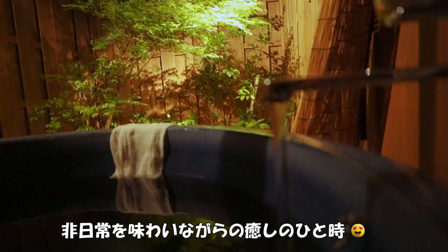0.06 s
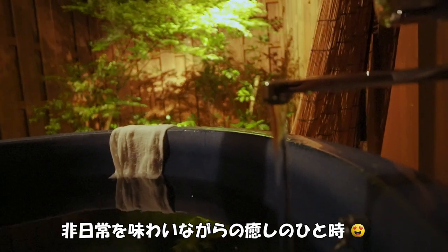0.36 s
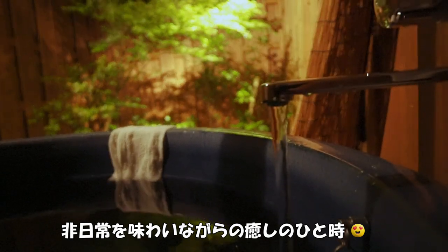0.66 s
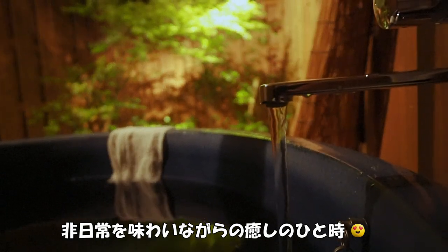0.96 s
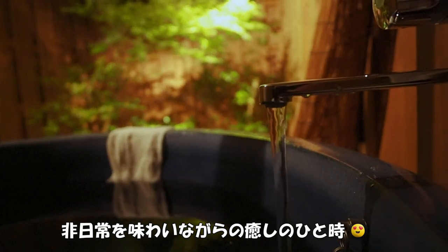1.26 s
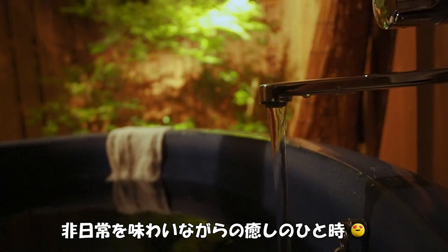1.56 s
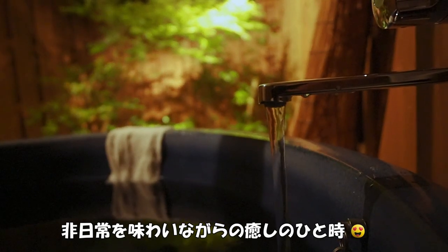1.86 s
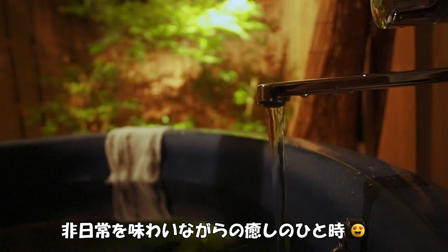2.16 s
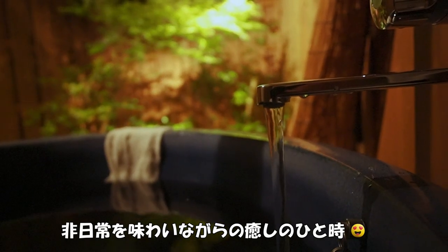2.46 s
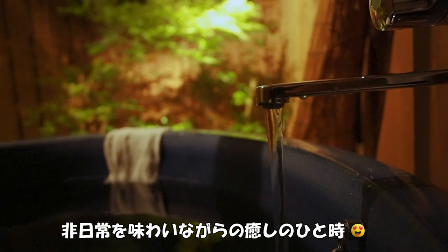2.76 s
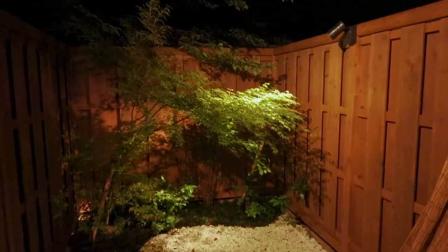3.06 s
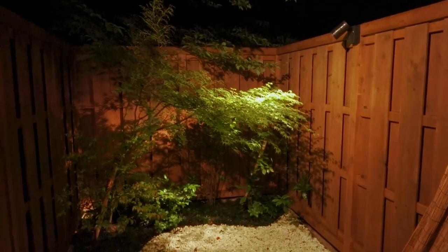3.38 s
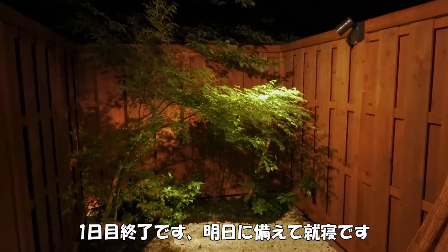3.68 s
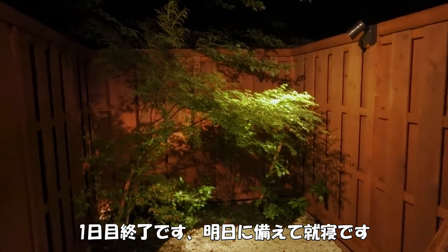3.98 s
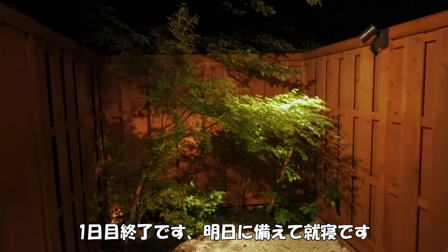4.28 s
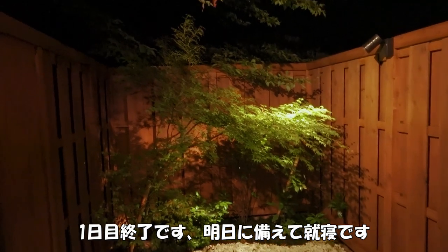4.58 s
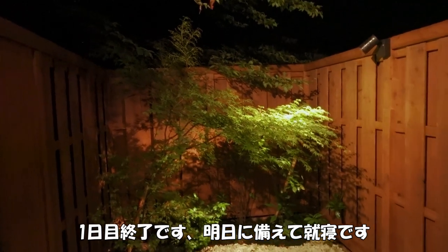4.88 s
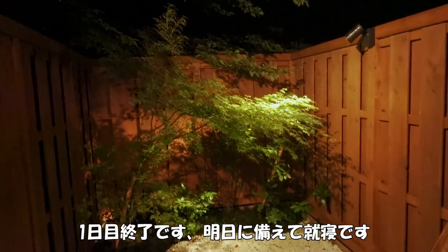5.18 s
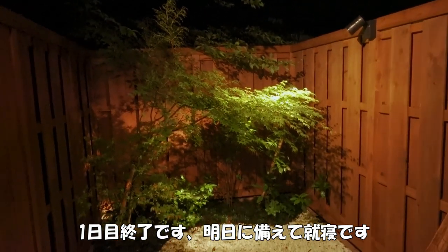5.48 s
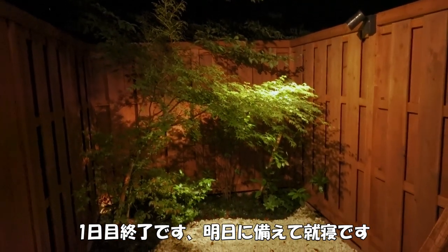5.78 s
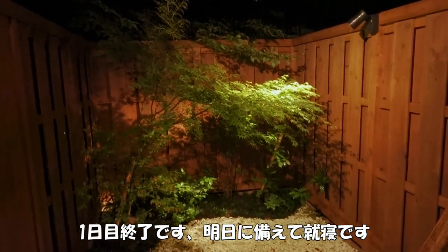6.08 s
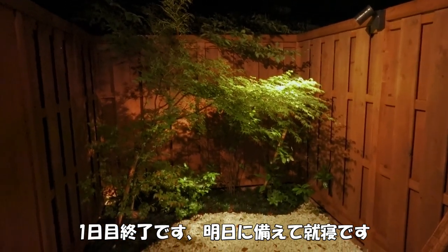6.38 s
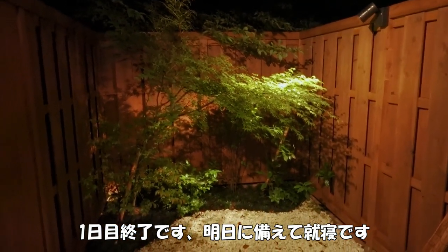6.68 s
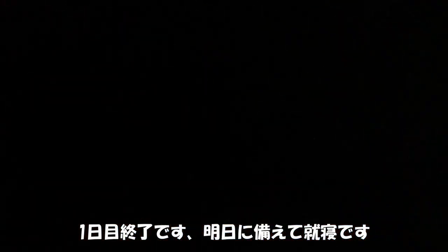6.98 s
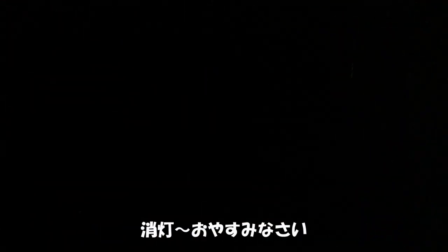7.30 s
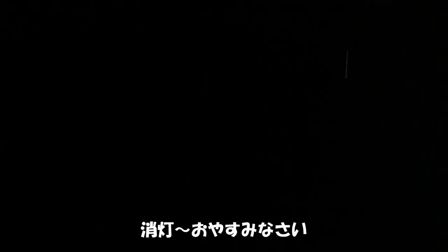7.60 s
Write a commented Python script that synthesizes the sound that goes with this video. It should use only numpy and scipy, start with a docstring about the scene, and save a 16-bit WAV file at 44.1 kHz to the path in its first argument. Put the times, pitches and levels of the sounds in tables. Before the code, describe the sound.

A tap trickles and drips into a full outdoor bath under shrill distant frogs, then much louder water suddenly patters and splashes down.

```python
"""A tap trickles and drips into a full outdoor bath at night; a pump hums, far frogs shrill.
After three seconds the scene jumps to the fenced garden, where water patters down loudly:
countless impacts merge into a rush, fat drops smack and spray, bubbles ring in puddles
and a few dull knocks sound. Impacts are noise bursts, bubbles are rising sine pings."""
import sys
import numpy as np
from scipy import signal
from scipy.fft import rfft, irfft
from scipy.io import wavfile
from scipy.ndimage import uniform_filter1d

SR = 44100
rng = np.random.default_rng(int(sys.argv[2]) if len(sys.argv) > 2 else 0)


def unload_audio(sound):
    """Save the sound as a 16-bit wav file, at the path given as the first command line argument."""
    columns = np.transpose(np.atleast_2d(sound))
    # keep every value between -1 and 1, then stretch to whole-number steps
    steps = np.round(np.clip(columns, -1, 1) * 32767)
    wavfile.write(sys.argv[1], SR, steps.astype(np.int16))


N = 336924
TIME = np.arange(N) / SR
CUT_S = 3.018  # tub to garden

# left-right likeness in each place: (frequency [Hz], correlation [-1..1])
TUB_CORR = [(280, .99), (640, .8), (1600, .85), (2400, .72), (3300, .8), (6000, .48), (10000, .35),
            (14000, 0)]
GARDEN_CORR = [(90, .94), (220, .99), (400, .96), (740, .87), (1600, .58), (2400, .62), (3600, .35),
               (5500, -.02), (9000, -.08), (15000, 0)]


def amp(db):
    """Decibels to gain."""
    return 10 ** (np.asarray(db) / 20)


def unit(x):
    """Scale to rms 1."""
    return x / np.sqrt(np.mean(x ** 2) + 1e-20)


def log_interp(points, hz):
    """Table lookup on a log-frequency axis."""
    f, value = np.transpose(points)
    return np.interp(np.log(hz + 1), np.log(f), value)


def add(mix, start_s, sound):
    """Add a stereo sound to the mix in place."""
    part = mix[:, round(start_s * SR):][:, :sound.shape[1]]
    part += sound[:, :part.shape[1]]


def shape(x, gain, corr):
    """Filter two independent channels by gain(hz), blend to correlation corr; rms 1."""
    hz = np.fft.rfftfreq(x.shape[1], 1 / SR)
    a, b = rfft(x)
    angle = np.arccos(np.clip(log_interp(corr, hz), -1, 1)) / 2
    mid, side = a * np.cos(angle), b * np.sin(angle)
    return unit(irfft(np.array([mid + side, mid - side]) * gain(hz), x.shape[1]))


def resonances(rows, hz):
    """Gain of steep-skirted bands; a row's dB sets its total power."""
    powers = (amp(db) ** 2 / width / (1 + ((hz - f) / width) ** 2) ** 3 for f, width, db in rows)
    return np.sqrt(sum(powers))


def drift(rate_hz):
    """Slow random curve, rms 1."""
    lowpass = np.exp(-(np.fft.rfftfreq(N, 1 / SR) / rate_hz) ** 2)
    return unit(irfft(rfft(rng.standard_normal(N)) * lowpass, N))


def patter(per_s, spread_db, decay_s):
    """Dense tiny impacts of uneven size, each a puff of noise; rms 1."""
    sizes = amp(spread_db * np.minimum(rng.exponential(1, N), 4))
    impacts = sizes * (rng.random(N) < per_s / SR)
    pole = np.exp(-2 / (decay_s * SR))
    power = signal.lfilter([1], [1, -pole], impacts ** 2)
    return unit(np.sqrt(power) * rng.standard_normal((2, N)))


def envelope(t, rise_s, decay_s):
    """Exponential rise and decay, peak 1."""
    swell = (1 - np.exp(-t / rise_s)) * np.exp(-t / decay_s)
    return swell / swell.max()


def burst(centre_hz, width_oct, rise_s, decay_s, corr=GARDEN_CORR, low_cut_hz=170):
    """One impact: a decaying noise band, rms about 1 at its crest."""
    t = np.arange(int((rise_s + decay_s) * 6 * SR) + 256) / SR
    noise = rng.standard_normal((2, len(t)))
    band = shape(noise, lambda hz: np.exp(-.5 * (np.log2((hz + 1) / centre_hz) / width_oct) ** 2), corr)
    swell = envelope(t, rise_s, decay_s)
    hit = signal.lfilter(*signal.butter(2, low_cut_hz, "high", fs=SR), band * swell)
    return unit(hit) * np.sqrt(np.mean(swell ** 2))


def ping(hz, rise_s, decay_s, corr=GARDEN_CORR, glide=0):
    """Pure ring, as of a bubble; pitch climbs by the fraction glide per decay time."""
    t = np.arange(int((rise_s + decay_s) * 7 * SR)) / SR
    phase = 2 * np.pi * hz * t * (1 + glide * t / decay_s / 2)
    stereo_rad = np.arccos(log_interp(corr, hz)) * np.array([[.5], [-.5]])
    return np.sqrt(2) * envelope(t, rise_s, decay_s) * np.sin(phase + stereo_rad)


def fence_echo(x, t60_s=.29):
    """Scattered reflections off the wooden fence, from 3 ms on."""
    t = np.arange(SR // 2) / SR
    taps = rng.standard_normal((2, len(t))) * (rng.random((2, len(t))) < .1)
    taps *= (t > .003) * amp(-60 * t / t60_s)
    taps = shape(taps, np.ones_like, GARDEN_CORR) / np.sqrt(len(t))
    return signal.fftconvolve(x, taps, axes=1)[:, :N]


def frog_chorus(count=60, notes_per_s=3.1, pulse_hz=130, blur=.15):
    """Far frogs repeat pulsed notes that distance melts together; unfiltered pulsing noise."""
    t = TIME[:N // 8 * 8:8]
    power = np.zeros(len(t))
    for pace, pitch, start in rng.uniform(-1, 1, (count, 3)):
        note = np.sin(np.pi * (notes_per_s * (1 + .27 * pace) * t + start)) ** 2
        pulses = np.exp(-(pulse_hz * (1 + .4 * pitch) * t % 1) / .71)
        power += (blur + note) * pulses
    return np.sqrt(np.interp(TIME, t, power)) * rng.standard_normal((2, N))


def tub_frogs(chorus, level_db=-41):
    """The chorus at the tub: three voice bands."""
    # frog voices: (centre [Hz], width [Hz], relative level [dB])
    voice_bands = [(1630, 344, -5.5), (3074, 263, 0.5), (3346, 313, 1.5)]
    return amp(level_db) * shape(chorus, lambda hz: resonances(voice_bands, hz), TUB_CORR)


def garden_frogs(chorus, level_db=-44, centre_hz=3110, width_hz=350, fade_db=-3, fade_from_s=5.9):
    """The chorus in the garden: one shrill band that eases off over a second."""
    voices = shape(chorus, lambda hz: resonances([(centre_hz, width_hz, 0)], hz), GARDEN_CORR)
    return voices * amp(level_db + fade_db * np.clip(TIME - fade_from_s, 0, 1))


def garden_hum():
    """Faint tones that waver in pitch."""
    # hum tones: (pitch [Hz], waver [Hz], relative level [dB])
    partials = [(211, 5, -7), (260, 3, 0), (548, 4, -6)]
    # hum swell: (time [s], level [dB])
    swell = [(3.0, -73), (5.7, -65), (6.4, -60), (6.9, -57.5), (7.2, -63), (7.6, -65)]
    tones = np.zeros(N)
    for hz, waver_hz, db in partials:
        pitch_hz = hz + waver_hz * drift(rate_hz=8.04)
        tones += amp(db) * np.sin(2 * np.pi * np.cumsum(pitch_hz) / SR)
    return unit(tones) * amp(np.interp(TIME, *np.transpose(swell)))


def pump(level_db=-61.9, waver_db=2.5):
    """Pump hum: narrow low noise bands, wavering in level."""
    # pump resonances: (centre [Hz], width [Hz], relative level [dB])
    hum_bands = [(141, 7.9, -76), (167.8, 5, -67.5), (219, 46, -69.5), (260.4, 5.4, -64.5),
                 (280.2, 8.9, -64.5)]
    hum = shape(rng.standard_normal((2, N)), lambda hz: resonances(hum_bands, hz), TUB_CORR)
    return hum * amp(level_db + waver_db * drift(rate_hz=3.7))


def tap_stream(level_db=-51, waver_db=.96):
    """A thin stream wavers as it enters the water; spout and tub add a faint ring."""
    # stream and surrounding air: (frequency [Hz], relative density [dB])
    spectrum = [(30, -42), (70, -19.5), (130, -8.5), (320, -3.5), (490, -11), (650, -4), (1000, -2.5),
                (1500, 4), (2400, 1.5), (4300, -2.5), (7200, -8), (10000, -15.5), (16000, -21)]
    # spout and tub resonances: (centre [Hz], width [Hz], boost [dB])
    rings = [(638, 20, 4), (5400, 170, 2.5), (6490, 160, 1.5), (7130, 150, 5), (8210, 160, 3.5),
             (9860, 200, 2.5)]

    def colour(hz):
        boost_db = sum(db * np.exp(-((hz - f) / width) ** 2) for f, width, db in rings)
        return amp(log_interp(spectrum, hz) + boost_db)

    water = patter(per_s=3500, spread_db=2, decay_s=.0036) * amp(waver_db * drift(rate_hz=14))
    return amp(level_db) * shape(water, colour, TUB_CORR)


def tap_drips(tick_db=-6, bubble_db=-10, plink_hz=1620, echo_db=-8):
    """Each drip ticks, a bubble pings, the tub plinks lower down; at times the stream fizzes."""
    # drips: (time [s], base level [dB], pitch [Hz], tick width [oct], plink level [dB])
    drips = [(0.0916, -36, 5520, .15, -54), (0.1615, -34, 4720, 0.41, -56), (0.3223, -39, 5700, 0.46, -43),
             (0.5886, -40, 6200, 0.31, -44), (1.05, -36, 3970, .22, -42), (1.292, -34.5, 5360, .3, -42),
             (1.3092, -39, 5650, .4, -42), (1.504, -35.5, 4400, 0.11, -48), (1.5487, -42, 4700, .4, -42),
             (1.8155, -40, 6900, 0.28, -45), (2.168, -39, 4070, .1, -52), (2.24, -37.5, 6840, 0.33, -46),
             (2.2872, -41, 7200, .55, -42), (2.4388, -38, 6750, 0.27, -40), (2.4756, -39, 5840, .25, -43),
             (2.5062, -40, 6750, 0.41, -45), (2.5835, -35.5, 5800, 0.32, -41.5)]
    # stream breaking up: (time [s], level [dB], centre [Hz], decay [s])
    fizzes = [(.09, -56, 5600, 0.02), (.165, -57, 6000, 0.05), (0.624, -55.5, 8100, 0.03),
              (1.04, -62, 8500, .08), (1.33, -60, 7500, 0.041), (1.549, -48, 4470, 0.084),
              (1.591, -54, 5200, .05), (2.045, -56, 9500, 0.021), (2.545, -55.5, 7000, 0.03),
              (2.758, -50.5, 7200, 0.038)]
    out = np.zeros((2, N))
    for s, db, hz, width_oct, plink_db in drips:
        add(out, s, amp(db + tick_db) * burst(hz, width_oct, rise_s=.0004, decay_s=.0015, corr=TUB_CORR))
        add(out, s, amp(db + bubble_db) * ping(hz, rise_s=.0007, decay_s=.003, corr=TUB_CORR, glide=.01))
        add(out, s, amp(plink_db) * ping(plink_hz, rise_s=.0008, decay_s=.007, corr=TUB_CORR))
    for s, db, hz, decay_s in fizzes:
        add(out, s, amp(db) * burst(hz, width_oct=.43, rise_s=.0072, decay_s=decay_s, corr=TUB_CORR))
    return out + amp(echo_db) * fence_echo(out)


def flurry_power(rise_s=.029, fade_s=.058):
    """Spray power: water lands in flurries that gather fast and thin out more slowly."""
    # flurry crests: (time [s], level [dB])
    crests = [(3.054, -32), (3.244, -33), (3.442, -37.5), (3.533, -40), (3.64, -37), (3.756, -35.5),
              (3.84, -35.5), (3.938, -37.5), (4.047, -34.5), (4.131, -39), (4.262, -35), (4.433, -35),
              (4.482, -40), (4.582, -42), (4.667, -36), (4.771, -33.5), (4.888, -33.5), (5.085, -32.5),
              (5.275, -35.5), (5.335, -39.5), (5.533, -34), (5.66, -41), (5.766, -33.5), (5.858, -33),
              (5.912, -39.5), (6.011, -36.5), (6.134, -40), (6.235, -34), (6.404, -34), (6.599, -34.5),
              (6.678, -35.5), (6.815, -33.5), (7.031, -34.5), (7.138, -34), (7.194, -43), (7.266, -36),
              (7.315, -38.5), (7.447, -35), (7.51, -36.5)]
    power = np.zeros(N)
    for s, db in crests:
        span = slice(max(int((s - .2) * SR), 0), int((s + .5) * SR))
        age_s = TIME[span] - s
        falloff = np.where(age_s < 0, (age_s / rise_s) ** 2, age_s / fade_s)
        power[span] += (amp(db) * np.exp(-falloff)) ** 2
    return power


def sparkle(x, depth_db):
    """Short random patches of the spectrum swell and fade; rms 1."""
    spectra = signal.stft(x, nperseg=256)[2]
    patches = rng.standard_normal(spectra.shape[1:])
    for _ in range(2):
        patches = uniform_filter1d(patches, size=7, axis=0)
        patches = uniform_filter1d(patches, size=6, axis=1)
    spectra *= amp(depth_db * unit(patches))
    return unit(signal.istft(spectra)[1][:, :N])


def rush(surge_exponent=.024, waver_db=.85, lull_db=-41.5):
    """Far water merges into an even rush that surges slightly with each flurry of near spray."""
    # far rush: (frequency [Hz], relative density [dB])
    far_spectrum = [(30, -33), (70, -31), (110, -24.5), (170, -15), (210, -7.5), (260, -6), (330, -3.5),
                    (540, 1), (1200, 2), (2600, 3.5), (4200, 2), (7500, -7.5), (12000, -8.5), (16000, -26)]
    # fine spray: (frequency [Hz], relative density [dB])
    near_spectrum = [(600, -45), (2000, -2.5), (4000, 1.5), (6500, 1.5), (9000, -0.5), (11800, -1),
                     (13500, -2), (16000, 0)]
    # swell of the far rush: (time [s], level [dB])
    swell = [(3.05, -38), (3.35, -38.5), (3.66, -38), (4.05, -37), (4.3, -38.5), (5.1, -38), (6.55, -38.5),
             (7.1, -37), (7.6, -38.5)]
    far = patter(per_s=6000, spread_db=2, decay_s=.002)
    far = shape(far, lambda hz: amp(log_interp(far_spectrum, hz)), GARDEN_CORR)
    near = patter(per_s=3000, spread_db=1.5, decay_s=.0018)
    near = shape(near, lambda hz: amp(log_interp(near_spectrum, hz)), GARDEN_CORR)
    near = sparkle(near, depth_db=1.5)
    near_gain = np.sqrt(amp(lull_db) ** 2 + flurry_power())
    far_gain = amp(np.interp(TIME, *np.transpose(swell)) + waver_db * drift(rate_hz=7.4))
    surge = (near_gain / np.median(near_gain[TIME > CUT_S])) ** surge_exponent
    return far * far_gain * surge + near * near_gain


def droplets(count=320, base_db=-42, spread_db=3, lowest_hz=1800):
    """Small drops all over the garden; the higher they ring, the sooner they die."""
    out = np.zeros((2, N))
    for when, pitch, faintness in rng.random((count, 3)):
        hz = lowest_hz * 8 ** pitch
        ring = burst(hz, width_oct=.48, rise_s=.0003, decay_s=14 / hz)
        start_s = CUT_S + when * (TIME[-1] - CUT_S)
        add(out, start_s, amp(base_db - spread_db * np.log(faintness + .26)) * ring)
    return out


def spatters(count=120, base_db=-38, spread_db=2, centre_hz=7500, spread_oct=.89):
    """Flurries throw off tiny ticking drops; stronger flurries throw more."""
    out = np.zeros((2, N))
    thrown = np.cumsum(np.sqrt(flurry_power()))
    for when, pitch, faintness in rng.random((count, 3)):
        hz = centre_hz * 2 ** (spread_oct * (2 * pitch - 1))
        tick = burst(hz, width_oct=.14, rise_s=.0004, decay_s=.0014)
        start_s = TIME[np.searchsorted(thrown, when * thrown[-1])]
        add(out, start_s, amp(base_db - spread_db * np.log(faintness + .1)) * tick)
    return out


def splashes(smack_db=1.5, ring_db=-6, scatter_db=-16, slap_db=-2.5, bubble_db=.6, echo_db=-10):
    """Fat drops smack and scatter droplets; others plop and gurgle in puddles, amid dull knocks."""
    # fat drops: (time [s], base level [dB], centre [Hz], smack width [oct], left minus right [dB])
    drops = [(3.038, -31, 12700, .5, 0), (3.0557, -27, 10000, 0.49, -3), (3.0988, -24.5, 11000, .7, -2),
             (3.238, -33, 8900, .5, -1), (3.245, -25, 7200, 0.48, 0), (3.432, -29, 8900, .6, -3),
             (3.601, -30, 12000, 0.3, -1), (3.6426, -27, 7300, .7, -2), (3.7468, -27, 7560, 0.38, -5),
             (3.7598, -28, 12600, .8, -2), (3.9125, -35, 7200, .6, -1), (3.9236, -21, 10900, .17, 0),
             (3.944, -23, 11800, .22, -1), (4.0418, -20.5, 11200, 0.3, -1), (4.134, -32, 10800, .4, -1),
             (4.25, -32, 8300, .6, -1), (4.2593, -32, 10800, .4, -3), (4.2918, -34, 7780, 0.37, -1),
             (4.311, -26.5, 11900, 0.46, -2), (4.4214, -37, 7600, .7, -1), (4.4655, -29, 8600, 0.43, 1),
             (4.566, -29, 13000, 0.49, -1), (4.77, -36, 10100, .5, -1), (4.879, -34, 11300, .35, -1),
             (4.8875, -32, 6940, 0.43, 10), (4.9485, -33.5, 10300, .5, -1), (5.087, -30, 9600, .5, -1),
             (5.2487, -34, 7600, .45, -1), (5.28, -30.5, 8400, 0.55, 7), (5.3198, -34, 8400, .7, -1),
             (5.479, -32, 12000, .5, -1), (5.542, -32, 11000, .4, -1), (5.6504, -27, 11400, .25, 0),
             (5.752, -30.5, 9000, .4, 1), (5.7868, -30, 12500, .8, -5), (5.849, -30, 6680, .8, -3),
             (5.9138, -35, 8000, .4, -1), (5.9967, -28, 7800, 0.9, 2), (6.0918, -31, 13850, .25, -1),
             (6.2181, -26, 14000, .4, -3), (6.2234, -18, 11500, .75, -3), (6.2964, -25, 9050, .7, 0),
             (6.398, -34, 6060, .35, -3), (6.4171, -33, 13500, .42, -7), (6.5735, -36, 10600, .4, -1),
             (6.5944, -23.5, 7100, 0.56, -2), (6.690, -33, 11600, .4, -1), (6.805, -27, 12300, 0.92, -3),
             (6.824, -30, 10100, 0.57, -3), (7.0302, -27, 7840, 0.32, -3), (7.084, -30, 10800, 0.45, -1),
             (7.1297, -24, 10400, 0.59, -1), (7.1871, -25, 12300, 0.22, -5), (7.312, -32, 8800, 0.51, -1),
             (7.441, -33, 5750, 0.29, 1), (7.460, -32.5, 11700, .4, -1)]
    # drops into puddles: (time [s], base level [dB], pitch [Hz])
    plops = [(3.2465, -30.5, 3400), (3.4333, -30.5, 2940), (3.480, -37, 2320), (3.5576, -25.5, 2170),
             (3.755, -30, 2450), (3.9505, -31, 2760), (4.075, -34, 2680), (4.259, -33, 3190),
             (4.4225, -27, 3730), (4.439, -30.5, 3560), (4.4848, -29.5, 3170), (4.573, -30, 4200),
             (4.7626, -28.5, 3510), (4.820, -28.5, 2280), (4.9337, -28.5, 3280), (5.091, -34.5, 3000),
             (5.5804, -28, 2050), (5.753, -30.5, 3070), (5.7932, -29.5, 2830), (5.85, -38, 3200),
             (6.6015, -31.5, 3410), (6.812, -32, 2820), (7.08, -32, 2570), (7.133, -27.5, 2480),
             (7.1378, -29.5, 2200), (7.265, -33, 2570), (7.321, -31.5, 3060)]
    # short gurgles after plops, brighter droplet splats: (time [s], level [dB], centre [Hz], width [oct])
    gurgles_and_splats = [(3.433, -36, 2400, 0.54), (3.556, -43, 4520, 0.1), (4.069, -42, 2640, 0.17),
                          (4.572, -37.5, 4600, 0.2), (4.814, -36.5, 2680, 0.87), (4.93, -40, 5100, 0.25),
                          (5.52, -40, 11400, 0.16), (5.788, -40.5, 2270, 0.042), (5.85, -46, 3200, 0.3),
                          (5.9, -37.5, 5500, 0.39), (6.122, -39.5, 3850, 0.16), (6.128, -41, 7540, 0.14),
                          (6.6, -42, 2700, 0.2), (7.135, -41, 2600, 0.73), (7.244, -38, 5030, 0.33),
                          (7.265, -38.5, 2700, 0.41)]
    # dull knocks, and a faint hollow ring near 750 Hz lingering as the garden begins:
    # (time [s], level [dB], centre [Hz], width [oct], decay [s])
    knocks_and_ring = [(3.05, -50.5, 743, 0.11, 0.26), (3.48, -34.5, 1230, 1.5, 0.032),
                       (3.481, -38.5, 905, 0.06, 0.024), (3.609, -39.5, 1300, 1.1, 0.053),
                       (4.751, -40.5, 538, 0.082, 0.041), (4.82, -32.5, 756, 1.16, 0.048),
                       (4.826, -37, 235, 0.38, 0.03), (4.835, -39, 530, 0.17, 0.039),
                       (4.94, -46.5, 302, 0.91, 0.075), (5.315, -38, 696, 0.93, 0.037),
                       (5.328, -48.5, 244, 0.23, 0.03), (6.937, -42.5, 453, 0.72, 0.059),
                       (6.945, -41.5, 290, 0.13, 0.026)]
    out = np.zeros((2, N))
    for s, db, hz, width_oct, pan_db in drops:
        gain = amp(db + np.array([[pan_db], [-pan_db]]) / 2)
        add(out, s, gain * amp(smack_db) * burst(hz, width_oct, rise_s=.0003, decay_s=.0012))
        add(out, s, gain * amp(ring_db) * burst(hz, width_oct=.1, rise_s=.0003, decay_s=.003))
        add(out, s, gain * amp(scatter_db) * burst(hz, width_oct=.86, rise_s=.005, decay_s=.0036))
    for s, db, hz in plops:  # surface slap, then the trapped bubble rings
        add(out, s, amp(db + slap_db) * burst(hz, width_oct=.7, rise_s=.0004, decay_s=.0028))
        add(out, s, amp(db + bubble_db) * ping(hz, rise_s=.0008, decay_s=.0015, glide=.02))
    for s, db, hz, width_oct in gurgles_and_splats:
        add(out, s, amp(db) * burst(hz, width_oct, rise_s=.013, decay_s=.036))
    for s, db, hz, width_oct, decay_s in knocks_and_ring:
        add(out, s, amp(db) * burst(hz, width_oct, rise_s=.0025, decay_s=decay_s))
    return out + amp(echo_db) * fence_echo(out)


def scene(crossfade_s=.003):
    """The tub, then the garden, where frogs and hum still show through the falling water."""
    chorus = frog_chorus()
    far_frogs = garden_frogs(chorus)
    shower = (rush() + droplets() + spatters()) * amp([[-.5], [.5]])  # slightly to the right
    garden = shower + splashes() + far_frogs + garden_hum()
    tub = tub_frogs(chorus) + pump() + tap_stream() + tap_drips()
    blend = np.clip((TIME - CUT_S) / crossfade_s, 0, 1)
    return (1 - blend) * tub + blend * garden


def record(dry):
    """Steep low-pass at 15.9 kHz."""
    lowpass = signal.firwin(511, 15900, window=("kaiser", 8), fs=SR)
    return signal.oaconvolve(dry, lowpass[None], "same", axes=1)


dry = scene()
out = record(dry)
unload_audio(out)
```